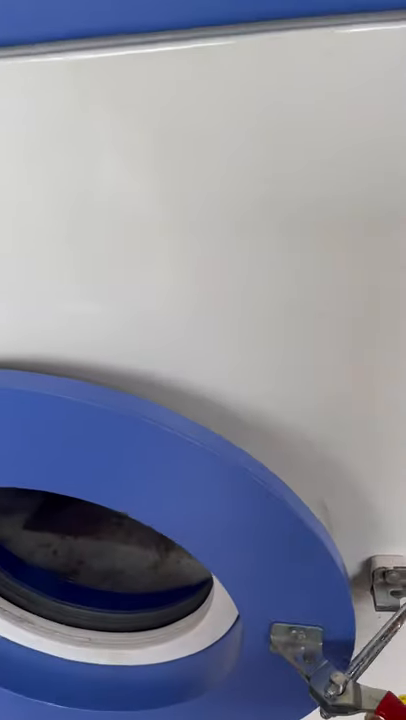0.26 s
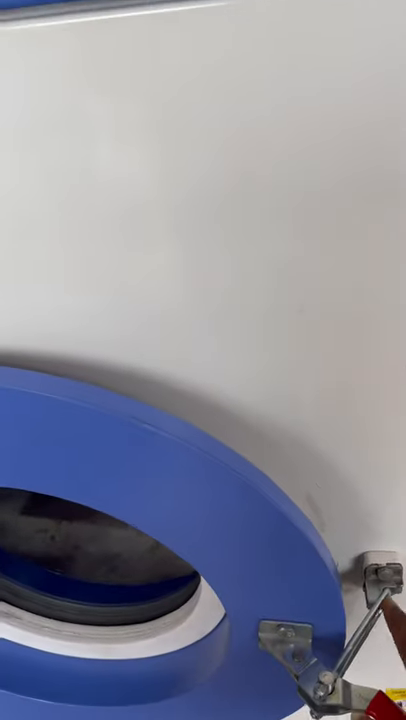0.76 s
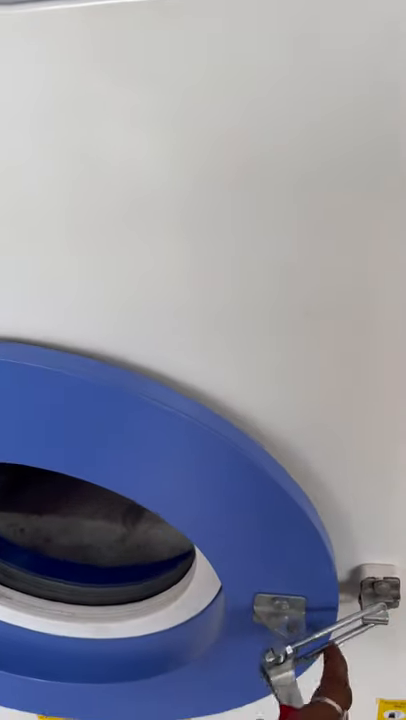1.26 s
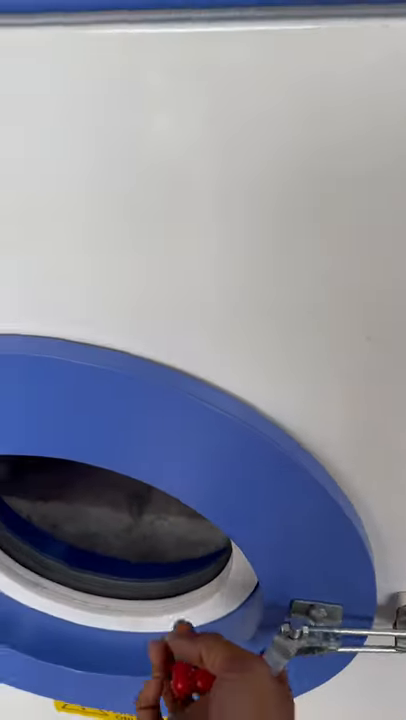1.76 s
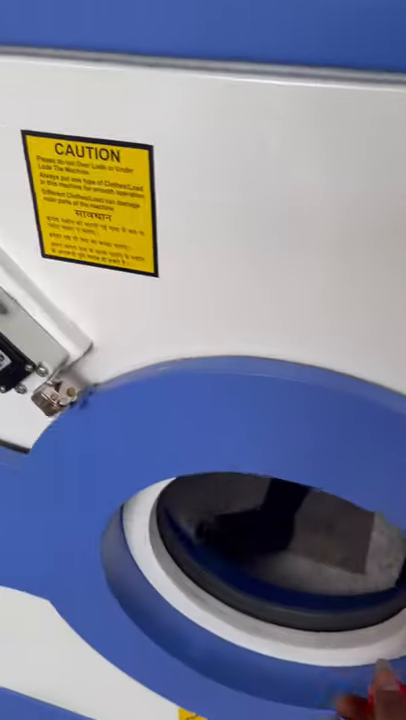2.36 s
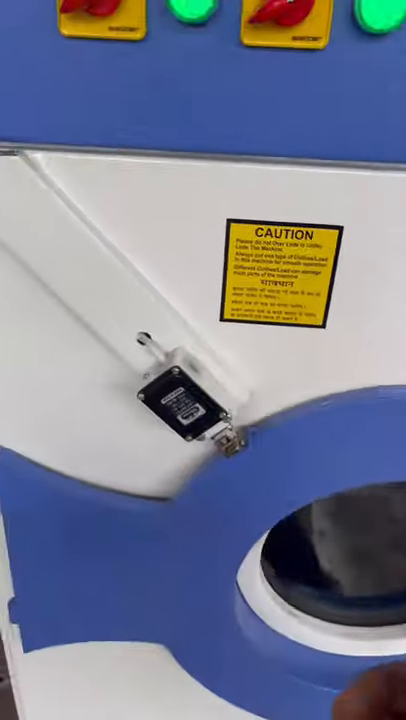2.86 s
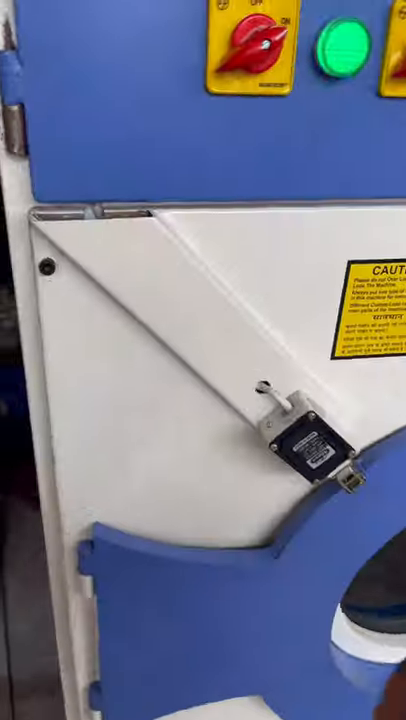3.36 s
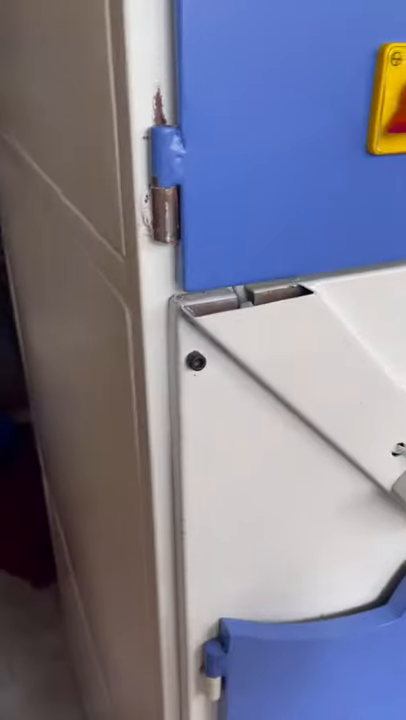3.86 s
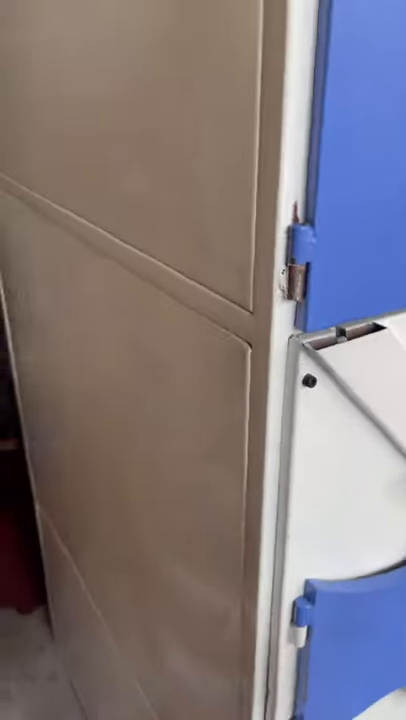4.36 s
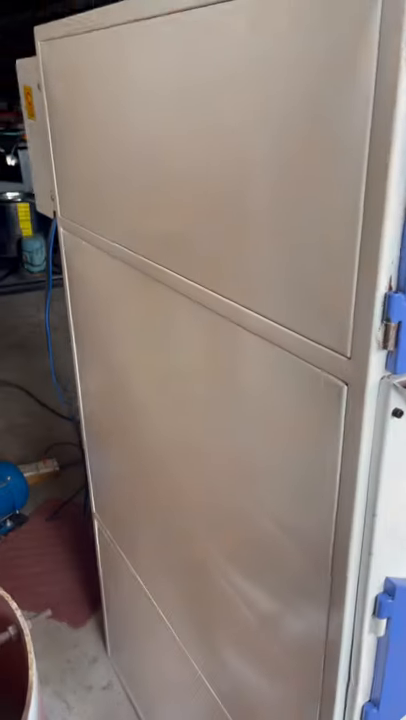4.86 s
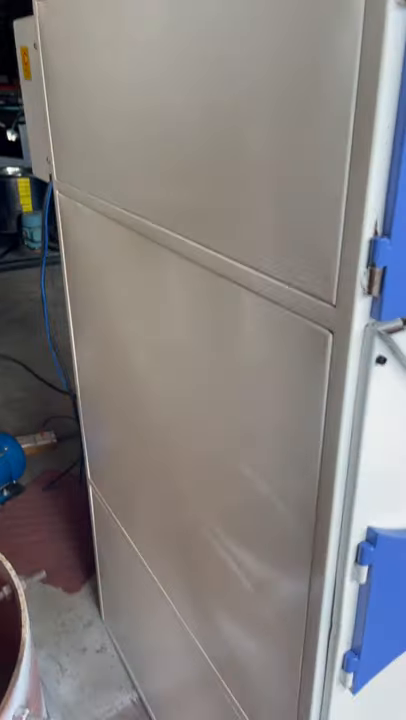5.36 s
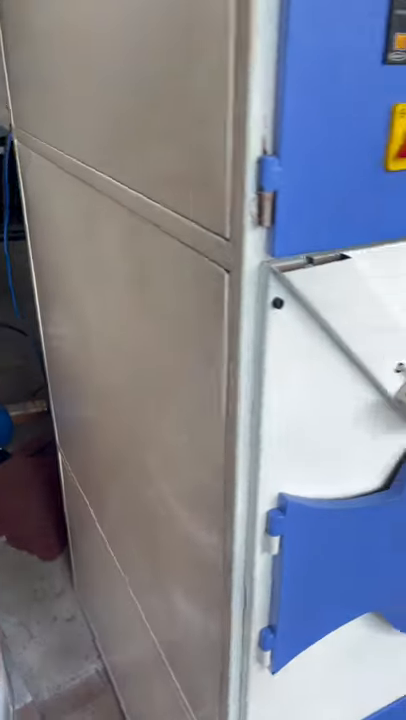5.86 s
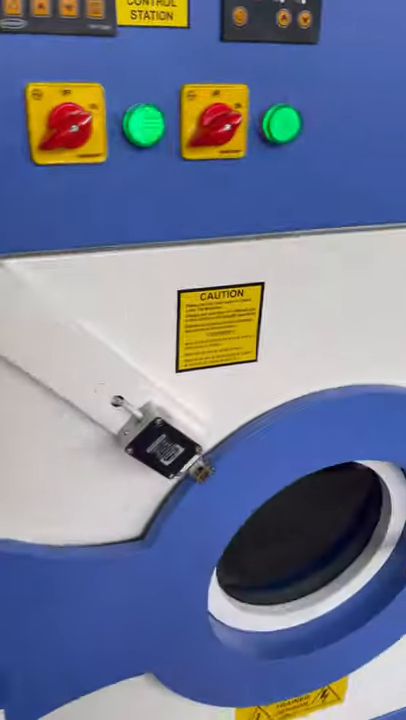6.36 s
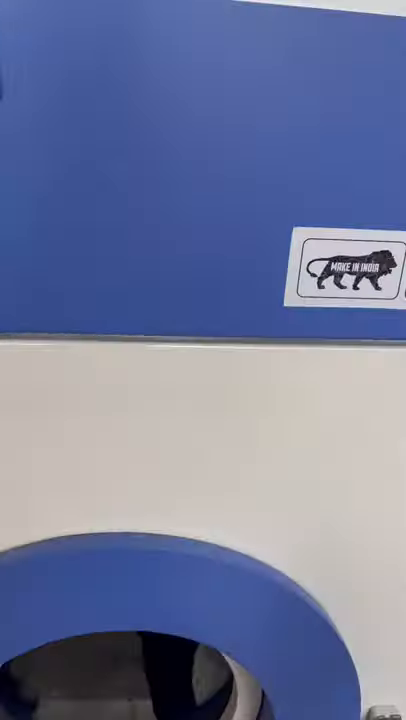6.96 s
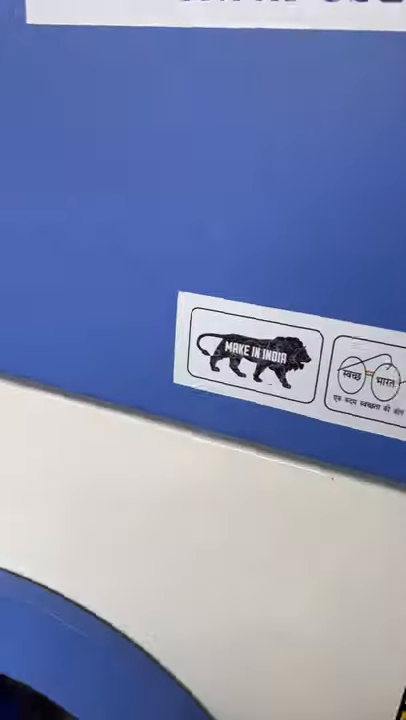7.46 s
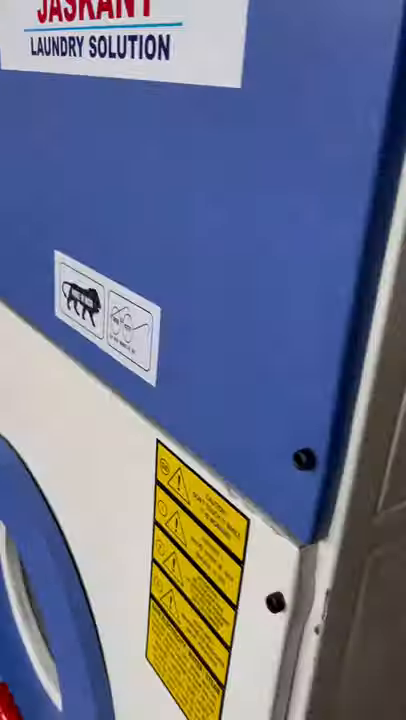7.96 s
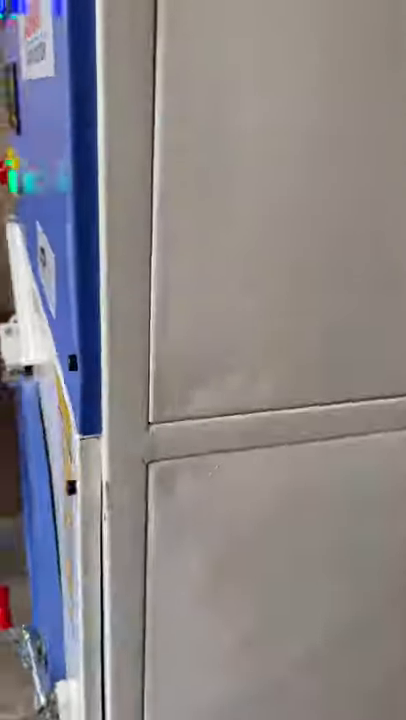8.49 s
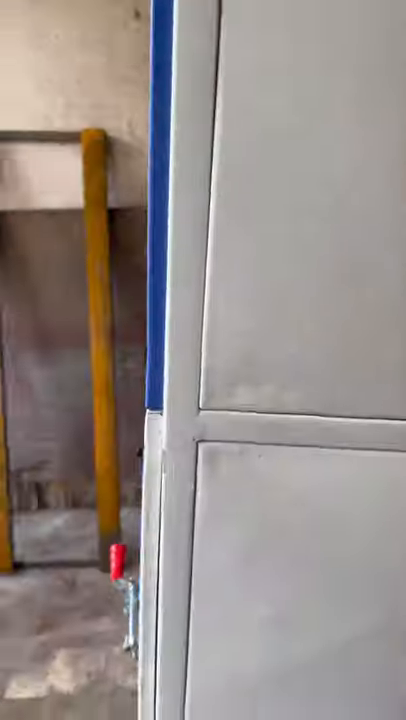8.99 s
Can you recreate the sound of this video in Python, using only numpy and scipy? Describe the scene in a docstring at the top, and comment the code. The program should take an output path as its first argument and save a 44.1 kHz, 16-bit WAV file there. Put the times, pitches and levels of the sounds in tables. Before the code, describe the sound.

Large tumble dryer just starting in a hard-walled workshop. The fan's hum glides upward for about two seconds, then holds. Early on, a latch being released gives a thin metallic ring, a few dry clicks, a clank and a last soft knock. After that only machine noise: deep rumble, hollow panel boom, duct roar and fine hiss, swelling and thinning as the close stereo phone passes along the cabinet.

```python
"""The blower of a commercial tumble dryer, just started, runs up to 47 turns a second: sines tied to its shaft angle.
A hand lets go of the steel door latch, which clicks, knocks and rings: noise bursts and damped modes.
The drum rumbles and the sheet-steel cabinet booms; air roars in the duct and hisses at the gaps: shaped noise.
A hand-held phone moves round the cabinet, through the standing waves of the low tones: level curves."""
import sys
import numpy as np
from scipy import signal
from scipy.fft import rfft, irfft, next_fast_len
from scipy.io import wavfile
from scipy.ndimage import uniform_filter1d, map_coordinates

SR = 44100
rng = np.random.default_rng(int(sys.argv[2]) if len(sys.argv) > 2 else 0)


def output_pcm(signal):
    """Save a mono or channel-first signal as 16-bit PCM at the path in sys.argv[1].

    Samples are clipped to [-1, 1] before scaling.
    """
    pcm = np.clip(np.atleast_2d(signal).T, -1, 1) * 32767
    wavfile.write(sys.argv[1], SR, np.round(pcm).astype(np.int16))


N = 407043
FULL_SPEED_HZ = 46.85  # blower shaft, turns a second


def blower(waver_db, jitter_rad, blade_lean_db, wake_db):
    """Rotor unbalance, shaft harmonics and the tone of eight blades, all tied to the shaft angle."""
    angle = 2 * np.pi * np.cumsum(shaft_speed_hz()) / SR
    blades = blade_tone(8 * angle, wake_db)
    octave = blade_octave(8 * angle)
    shake = unbalance(angle)
    hum = shaft_hum(angle, waver_db, jitter_rad)
    lean = amp([[blade_lean_db / 2], [-blade_lean_db / 2]])
    return blades * lean + octave + shake + hum


def shaft_speed_hz():
    """The blower shaft runs up to full speed, in turns a second."""
    # run-up: (time [s], shaft speed [turns/s])
    run_up = [(0, 34.5), (.3, 37.9), (.6, 40.8), (1, 43.3), (1.5, 45.25), (2, 46.05), (2.6, 46.6),
              (3.5, 46.85), (9.23, 46.85)]
    return curves(run_up)[0]


def blade_tone(blade_angle, wake_db):
    """Blade-passing tone and the turbulent wake beside it, both through one standing wave of the room."""
    # blade tone at the phone: (time [s], peak level [dB])
    blade_level = [(0, -25), (.12, -30), (.17, -34), (.26, -21.5), (.45, -35), (.62, -27.5), (.8, -24.5),
                   (.97, -36), (1.18, -26.5), (1.33, -31.5), (1.52, -23.5), (1.66, -29.5), (1.87, -26.5),
                   (2.07, -34.5), (2.45, -25.5), (3.1, -22.5), (3.5, -24), (3.85, -34), (4.05, -41),
                   (4.4, -30), (4.7, -25), (5.35, -24.5), (5.9, -33), (6.2, -22.5), (6.7, -18.5),
                   (7.15, -24), (7.7, -30.5), (8.1, -24.5), (8.4, -19), (8.6, -17.5), (9.05, -16),
                   (9.23, -18)]
    tone = amp(0.45 * wobble(12)) * np.sin(blade_angle + 0.055 * wobble(9))
    wake = wobble(26) * np.cos(blade_angle) + wobble(26) * np.sin(blade_angle)
    return amp(curves(blade_level)[0]) * (tone + amp(wake_db) * wake)


def blade_octave(blade_angle):
    """The octave of the blade tone has a standing wave of its own."""
    # octave at the phone: (time [s], level [dB])
    octave_level = [(0, -62), (1.3, -53), (2.2, -39), (3, -55), (4.2, -40), (6.8, -59), (7.4, -33.5),
                    (8.1, -53), (9.23, -57)]
    level_db = curves(octave_level)[0] + 1.2 * wobble(11)
    return amp(level_db) * np.sqrt(2) * np.sin(2 * blade_angle + 0.55 * wobble(16))


def unbalance(angle):
    """Rotor unbalance shakes the machine once a turn, harder at speed."""
    level_db = driven(full_db=-55.5, doubling_db=24) + near(place_m=-0.67, reach_m=1.3, lift_db=21.5)
    return amp(level_db + 1.0 * wobble(7.3)) * np.sqrt(2) * np.sin(angle)


def shaft_hum(angle, waver_db, jitter_rad):
    """Sines at multiples of the shaft angle; turbulence blurs the phase of the higher ones more."""
    # faint tones, a belt-driven part gives the fractional one:
    # (multiple of shaft rate [-], level before the front panel's gain [dB])
    faint_tones = [(3.715, -36.5), (25, -47)]
    # strong harmonics, each through its own standing wave:
    # multiple of shaft rate [-] -> (time [s], level [dB])
    strong_harmonics = { 2: [(0, -40), (.75, -27), (1.25, -40), (1.8, -25.5), (2.7, -36.5), (3.5, -40),
                        (5, -40), (6.7, -41), (7.3, -28), (9.23, -32)], 4: [(0, -50), (1.3, -39),
                        (2.2, -30), (2.8, -27.5), (4.3, -34), (5.3, -28), (6.3, -31), (6.75, -30),
                        (7.6, -31), (8.3, -32), (9.23, -34)], 5: [(0, -40), (.7, -28), (1.3, -25),
                        (1.75, -33), (2.2, -28.5), (3.25, -30.5), (3.8, -44), (5.8, -52), (6.6, -29),
                        (7.3, -25), (7.75, -27.5), (8.3, -38)], 6: [(2.2, -46), (2.8, -33), (3.7, -31),
                        (4.6, -34), (5.5, -36.5), (7.7, -43), (8.3, -55)]}
    hum = np.zeros(N)
    for multiple, db in faint_tones:
        phase = multiple * (angle + jitter_rad * wobble(17)) + .5 * wobble(1.52)
        hum += amp(db + waver_db * wobble(2.99)) * np.sqrt(2) * np.sin(phase)
    # the front panel radiates the faint tones: loudest at the door
    hum *= amp(driven(full_db=-4.5, doubling_db=24) + near(place_m=0.042, reach_m=0.71, lift_db=5.0))
    for multiple, levels in strong_harmonics.items():
        phase = multiple * (angle + jitter_rad * wobble(17)) + .5 * wobble(1.542)
        hum += amp(curves(levels)[0] + 0.93 * wobble(6)) * np.sqrt(2) * np.sin(phase)
    return hum


def latch(click_t60_s, low_hz, high_hz, knock_db, knock_t60_s):
    """Each contact scrapes briefly; lever, hook and catch ring and the door knocks dryly, by where it lands."""
    # contacts: (time [s], click before its band filter [dB], lever [dB], hook [dB], catch [dB], door [dB])
    contacts = [(0.001, -38, -21.5, -38, -60, -50), (0.144, -36, -60.5, -60, -54, -21),
                (0.1979, -27, -54, -54, -58, -48), (0.2342, -27.5, -56.5, -42, -40, -22),
                (0.2997, -29, -60, -36, -58, -50), (0.701, -30, -35, -33, -33, -28),
                (0.7061, -31, -42, -44, -42, -17.5), (0.711, -36, -55, -30, -50, -40),
                (0.722, -37, -52, -37, -54, -37), (0.9464, -33, -60, -50, -55, -45),
                (1.199, -35, -61, -52, -46, -21)]
    # modes of each part: (frequency [Hz], level re the part's contact level [dB], t60 [s])
    lever = [(3677, -18, .35), (7224, 0, .31), (8393, -18, .3), (11480, -20, .25)]
    hook = [(5530, -2, .07), (5610, -6, .06), (5790, -5, .04), (9702, -12, .06), (11670, -12, .04)]
    catch = [(2450, -3, .03), (2950, -2, .03), (3370, -3, .03), (3870, -2, .03), (3990, -2, .04),
             (4242, -6, .04)]
    door = [(1040, -7, 0.035), (1320, -7, 0.043), (1560, -11.5, 0.04), (2460, -15, 0.04), (2660, -13, 0.04)]
    # response of the door's dry knock: (frequency [Hz], gain [dB])
    knock_response = [(600, -18), (1000, -4), (1500, 0), (2100, -3), (3800, -7), (5500, -28)]

    clicks, knocks, metal = np.zeros((3, 2, N + SR))
    t = np.arange(SR // 2) / SR
    for s, click_db, lever_db, hook_db, catch_db, door_db in contacts:
        start = max(round(s * SR), 0)
        span = slice(start, start + len(t))
        clicks[:, span] += amp(click_db - 60 * t / click_t60_s) * rng.standard_normal((2, len(t)))
        knocks[:, span] += amp(door_db + knock_db - 60 * t / knock_t60_s) * rng.standard_normal(len(t))
        for modes, db in (lever, lever_db), (hook, hook_db), (catch, catch_db), (door, door_db):
            metal[:, span] += amp(db) * ring(modes, t)

    def click_band(hz):
        low_cut = 1j * hz / (low_hz + 1j * hz)
        return low_cut * (high_hz / (high_hz + 1j * hz)) ** 2

    def door_body(hz):
        return amp(along(knock_response, hz, outside=-120))

    return filtered(clicks[:, :N], click_band) + filtered(knocks[:, :N], door_body) + metal[:, :N]


def ring(modes, t):
    """Damped modes, each reaching the two ports at its own phase."""
    total = 0
    for hz, db, t60_s in modes:
        turns = hz * t + rng.random((2, 1)) / 10
        total = total + amp(db - 60 * t / t60_s) * np.sin(2 * np.pi * turns)
    return total


def cabinet():
    """The rolling drum rumbles and sets the big steel panels booming."""
    tumble = wobble(7)  # the tumbling load makes the rumble swell unevenly
    return drum_rumble(tumble) + deep_thud() + front_panel(tumble) + side_panel()


def drum_rumble(tumble):
    """Low noise of the rolling drum, swelling with the load."""
    # rumble at the phone: (time [s], level [dB])
    rumble_level = [(0, -32), (.3, -25), (1.2, -25), (1.9, -23.5), (2.7, -24), (4.2, -26), (4.7, -24.5),
                    (6, -26), (6.8, -24.5), (7.5, -23.5), (8.5, -24.5), (9.23, -26)]
    # rumble spectrum: (frequency [Hz], relative density [dB per Hz])
    rumble_band = [(20, -30), (36, -25), (48, -13), (62, -2), (68, -4), (78, -1), (94, 1.5), (108, 3),
                   (118, -8), (132, -2.5), (155, -8), (180, -9), (260, -67)]
    noise = even(rush(rumble_band, patchy_db=2.0), share=.3, size=8000)
    return amp(curves(rumble_level)[0] + 0.5 * tumble) * noise


def deep_thud():
    """The deepest rumble carries best along the left side of the machine."""
    # thud spectrum: (frequency [Hz], relative density [dB per Hz])
    thud_band = [(20, -24), (36, -16), (44, 10), (50, 16), (57, 12), (63, 17), (80, -37)]
    level_db = driven(full_db=-57, doubling_db=4) + near(place_m=-.8, reach_m=1.25, lift_db=14.0)
    return amp(level_db) * rush(thud_band, patchy_db=3.0)


def front_panel(tumble):
    """Boom of the front panel, loudest close to the door."""
    # front boom at the phone: (time [s], level [dB])
    front_level = [(0, -25.5), (.4, -22.8), (1.5, -19.5), (2.2, -21), (3.2, -22.5), (3.9, -26.5),
                   (4.7, -25.5), (5.9, -27.5), (6.5, -23), (7.3, -23), (8.2, -25.5), (9.23, -23.5)]
    # front boom spectrum: (frequency [Hz], relative density [dB per Hz])
    front_band = [(120, -54), (160, -10), (174, -1.5), (182, -4.5), (193, 3.5), (204, 1), (219, 2),
                  (232, 2), (243, -7.5), (260, -22), (330, -73.5)]
    noise = even(rush(front_band, patchy_db=4.5, size=3), share=0.68, size=7000)
    return amp(curves(front_level)[0] + 0.23 * tumble) * noise


def side_panel():
    """Boom of the side panel, loudest at the left corner."""
    # side boom at the phone: (time [s], level [dB])
    side_level = [(0, -33), (2.4, -31), (2.75, -28), (3.1, -29), (3.45, -24.5), (3.7, -29), (4, -22.5),
                  (4.6, -32.5), (5.3, -28), (5.6, -30.5), (5.9, -27), (6.9, -33), (7.8, -29.5),
                  (9.23, -33.5)]
    # side boom spectrum: (frequency [Hz], relative density [dB per Hz])
    side_band = [(115, -30), (135, 0), (155, -3), (180, -26), (225, -22), (248, -2.5), (266, 2.5),
                 (279, 9.5), (290, 4), (302, 1), (318, -2), (380, -58)]
    return amp(curves(side_level)[0]) * rush(side_band, patchy_db=3.0, size=3)


def airflow(leak_db, surge_db):
    """Air roars in duct and grille and hisses out of the gaps; a common flutter and surge moves the levels."""
    flutter = wobble(20) + amp(surge_db) * wobble(6.7)
    return duct_roar(flutter) + duct_howl() + grille_rush(flutter) + gap_hiss(flutter, leak_db)


def duct_roar(flutter):
    """Turbulence in the duct, coloured by its resonances."""
    # duct spectrum: (frequency [Hz], relative density [dB per Hz])
    duct_band = [(220, -38), (320, 2), (400, 3), (440, 1.5), (490, 0.5), (560, -3), (640, -6), (720, -6),
                 (860, -6.5), (970, -8.5), (1200, -34), (1800, -71)]
    # duct resonances: (frequency [Hz], width [Hz], lift [dB])
    duct_modes = [(490, 15, 2.5), (697, 21, 4.5), (787, 25, 3.5), (838, 13.6, 7.5), (880, 16, 3.5)]
    level_db = driven(full_db=-28.0, doubling_db=11) + near(place_m=0.97, reach_m=0.44, lift_db=1.3)
    return amp(level_db + 0.8 * flutter) * rush(duct_band, patchy_db=2, modes=duct_modes)


def duct_howl():
    """Hollow howl of the duct, its upper resonance and a narrow one that the blade tone climbs through."""
    # levels at the phone: (time [s], level [dB])
    howl_level = [(0, -48), (1.1, -33), (1.8, -45), (2.3, -37), (3.8, -47), (4.7, -42.5), (6.3, -41),
                  (7.5, -28.5), (8.1, -40), (8.6, -32.5), (9.23, -35)]
    upper_level = [(0, -43), (1.2, -34), (1.8, -37.5), (2.2, -35), (2.9, -43.5), (7, -43.5), (7.4, -34),
                   (8.1, -45), (9.23, -52)]
    pipe_level = [(0, -58), (.4, -41), (1.3, -32), (2.1, -45), (3, -33), (4.5, -43), (7.8, -35), (8.5, -26),
                  (9.23, -32)]
    # spectra: (frequency [Hz], relative density [dB per Hz])
    howl_band = [(460, -34), (495, -9), (521, 5.5), (540, -5), (565, -5.5), (620, -28)]
    upper_band = [(630, -21), (690, -2.5), (720, -11), (748, -1.5), (775, -1.5), (812, -6), (839, 0.5),
                  (865, -2.5), (910, -18)]
    pipe_band = [(348, -30), (356, -6), (361, 1.5), (366, -10.5), (374, -26)]
    howl = amp(curves(howl_level)[0] + 1.2 * wobble(16)) * rush(howl_band, patchy_db=4.5)
    upper = amp(curves(upper_level)[0]) * rush(upper_band, patchy_db=5.5)
    pipe = amp(curves(pipe_level)[0]) * even(rush(pipe_band, patchy_db=0.8), share=0.45, size=12000)
    return howl + upper + pipe


def grille_rush(flutter):
    """Turbulence at the grille, coloured by its resonances."""
    # grille spectrum: (frequency [Hz], relative density [dB per Hz])
    grille_band = [(600, -3), (900, -13.5), (1000, -2), (1200, 3), (1300, -1.5), (1540, -0.5),
                   (1750, -12.5), (2600, -59)]
    # grille resonances: (frequency [Hz], width [Hz], lift [dB])
    grille_modes = [(1010, 40, 4.5), (1102, 22, 5.5), (1160, 32, 1), (1382, 60, 3), (1462, 24, 5)]
    level_db = driven(full_db=-35.0, doubling_db=7.5) + near(place_m=0.81, reach_m=0.23, lift_db=3.5)
    noise = rush(grille_band, patchy_db=2.5, modes=grille_modes)
    return amp(level_db + 0.5 * flutter + 0.27 * wobble(20)) * noise


def gap_hiss(flutter, leak_db):
    """Hiss from the gaps, and a finer one that leaks at the door seal and the right corner."""
    # hiss at the phone: (time [s], level [dB])
    hiss_level = [(0, -39.5), (.5, -36.5), (1.3, -33), (2.3, -34.5), (2.95, -34.5), (3.8, -35), (5.7, -36),
                  (6.6, -33.5), (7.5, -35), (8.1, -33.2), (8.55, -32.5), (9.23, -34.5)]
    # spectra: (frequency [Hz], relative density [dB per Hz])
    hiss_band = [(900, -48), (1600, -5.5), (1950, -1), (2400, 1.5), (3000, -1), (4000, -4.5), (5200, -9.5),
                 (7000, -23), (12000, -60)]
    fine_band = [(3000, -4.5), (5000, -5.5), (6000, 1), (7200, 0), (9000, 3.5), (10400, 3), (11500, -4),
                 (12300, -13), (13000, -61)]
    hiss_db = curves(hiss_level)[0] + 0.65 * flutter + 0.46 * wobble(20)
    # here the lifts are multiples of leak_db
    leak = near(place_m=-0.043, reach_m=0.45, lift_db=1) + near(place_m=0.86, reach_m=0.28, lift_db=1.1)
    fine_db = driven(full_db=-39.5, doubling_db=2.5) + leak_db * leak
    hiss = amp(hiss_db) * rush(hiss_band, patchy_db=2.5, size=14)
    fine = amp(fine_db + 0.13 * flutter + 0.76 * wobble(14)) * rush(fine_band, patchy_db=2.2)
    return hiss + fine


def driven(full_db, doubling_db):
    """Level (dB) of a part that gains doubling_db with each doubling of the shaft speed."""
    return full_db + doubling_db * np.log2(shaft_speed_hz() / FULL_SPEED_HZ)


def near(place_m, reach_m, lift_db):
    """Lift (dB) while the phone passes the place on the cabinet where a part is loudest."""
    # the phone's way, cabinet corners near -0.8 and 0.8 m: (time [s], distance right of the door [m])
    path = [(0, 0.44), (1.4, 0.15), (2.2, -0.3), (3, -0.33), (3.5, -0.67), (4.2, -1), (4.8, -0.89),
            (5.9, -0.7), (6.6, -0.29), (7.4, 0.36), (8.4, 0.89), (9.23, 1.1)]
    phone_m, = curves(path)
    return lift_db * np.exp(-((phone_m - place_m) / reach_m) ** 2)


def rush(spectrum, patchy_db, modes=(), size=8):
    """Stereo turbulence of rms 1; patches, size bins wide, drift as the phone moves among reflections."""
    # the two microphone ports: (frequency [Hz], likeness [0-1])
    likeness = [(100, 1), (250, 1), (450, 0.89), (700, 0.33), (1100, 0.56), (1800, 0.99), (2300, 0.62),
                (2800, 0.14), (4000, 0), (5000, 0.55), (5300, 1), (6700, 0.82), (7200, 1), (10000, 1)]
    hz = np.fft.rfftfreq(8192, 1 / SR)[:, None]
    shape = (len(hz), N // 4096 + 3)
    field = uniform_filter1d(rng.standard_normal(shape), size=size, axis=0)
    field = uniform_filter1d(field, size=6, axis=1)
    db = along(spectrum, hz, outside=-120)
    for mode_hz, width_hz, lift_db in modes:
        db = db + lift_db / (1 + (2 * (hz - mode_hz) / width_hz) ** 2)
    real, imag = rng.standard_normal((2, 2, *shape))
    turn = np.arccos(np.clip(along(likeness, hz), 0, 1)) / 2
    gain = amp(db + patchy_db * unit(field))
    # the patches shift the colour while the total power holds
    gain = gain / np.linalg.norm(gain, axis=0)
    bins = (real + 1j * imag) * gain * [np.cos(turn), np.sin(turn)]
    mid, side = signal.istft(bins, window="cosine")[1][:, :N]
    return unit(np.array([mid + side, mid - side]))


def even(x, share, size):
    """Take a share of the slow chance swells (size samples) out of a noise, so that it churns evenly."""
    power = np.abs(uniform_filter1d(np.mean(x ** 2, axis=0), size=size)) + 1e-6
    return unit(x / power ** (np.clip(share, 0, 1) / 2))


def wobble(rate):
    """A smooth random curve, rate knots a second."""
    coarse = np.linspace(0, N, 8192)
    knots = rng.standard_normal(int(N * rate / SR) + 4)
    smooth = map_coordinates(knots, [coarse * rate / SR])
    return np.interp(np.arange(N), coarse, smooth)


def curves(rows):
    """One value per sample for each column after the time."""
    s, *cols = np.transpose(rows)
    return [np.interp(np.arange(N) / SR, s, c) for c in cols]


def along(points, hz, outside=None):
    """(Hz, value) points read on a log axis; beyond the ends they hold, or take the value outside."""
    f, v = np.transpose(points)
    return np.interp(np.log(hz + 1), np.log(f + 1), v, outside, outside)


def amp(db):
    """Decibels to gain."""
    return 10 ** (np.asarray(db) / 20)


def unit(x):
    """Scale to rms 1."""
    return x / np.sqrt(np.mean(x ** 2) + 1e-20)


def filtered(x, response):
    """x times a response of frequency."""
    m = next_fast_len(N + SR // 2)
    return irfft(rfft(x, m) * response(np.fft.rfftfreq(m, 1 / SR)), m)[..., :N]


def arrive(x, lead):
    """Sound from one direction reaches the two ports at different phases."""
    return filtered(x, lambda hz: np.exp(.5j * along(lead, hz) * np.array([[1], [-1]])))


def scene():
    """All parts of the machine at the two ports; the latch arrives from its own direction."""
    # phase between the ports: (frequency [Hz], lead of the left port [rad])
    machine_lead = [(100, 0), (700, -.1), (2100, .1), (3000, -1.4), (4300, -3.8), (4900, -2.8), (5350, -.9),
                    (5800, -.1), (6700, .7), (8350, 2.9), (9650, 3.4), (11500, 5.5), (12500, 6.2)]
    latch_lead = [(2000, .2), (4000, -.2), (5600, -.4), (7200, 1.6)]
    fan = blower(waver_db=0.5, jitter_rad=0.017, blade_lean_db=-1.0, wake_db=-15)
    steel = cabinet()
    air = airflow(leak_db=3.5, surge_db=-6.5)
    contact = latch(click_t60_s=0.041, low_hz=800, high_hz=6300, knock_db=0.5, knock_t60_s=0.059)
    return arrive(fan + steel + air, machine_lead) + arrive(contact, latch_lead)


def record(dry):
    """The two ports differ in level, and the band is limited."""
    # level between the ports: (frequency [Hz], left minus right [dB])
    lean = [(60, -1.5), (110, -1.5), (200, -2.4), (370, -4), (650, -3.7), (1180, -1.7), (2150, 0),
            (3900, -1), (5100, -2.5), (5700, 0)]
    top_hz = 13200

    def ports(hz):
        return amp(along(lean, hz) * np.array([[.5], [-.5]])) * (hz < top_hz)

    return filtered(dry, ports)


dry = scene()
out = record(dry)
output_pcm(out)
```